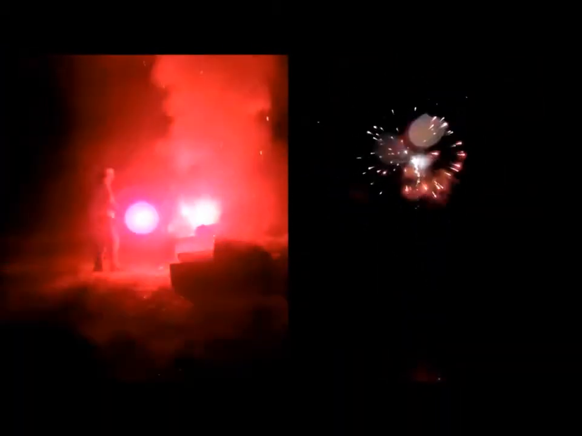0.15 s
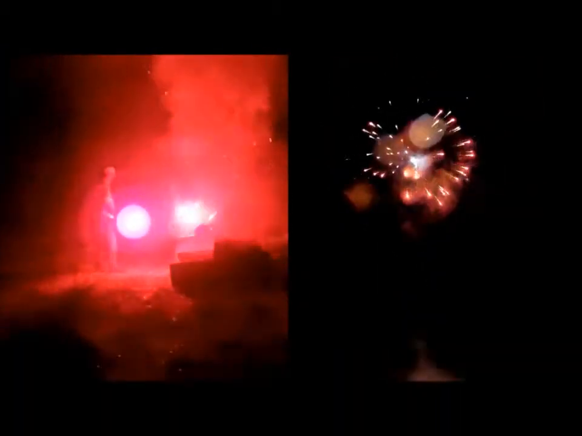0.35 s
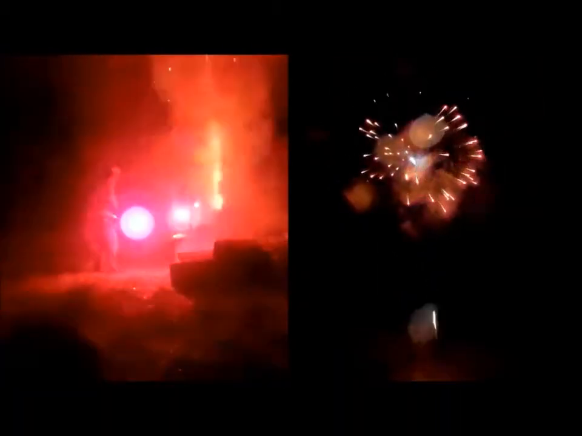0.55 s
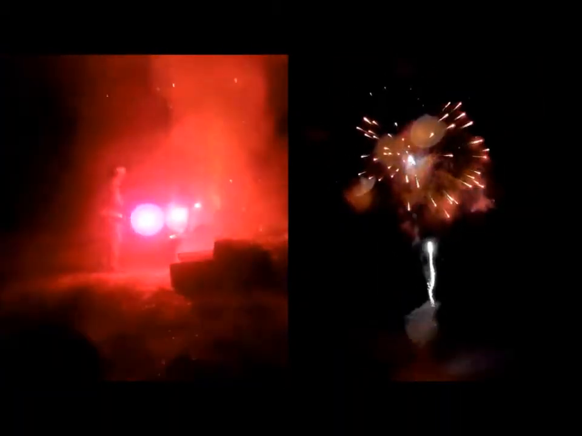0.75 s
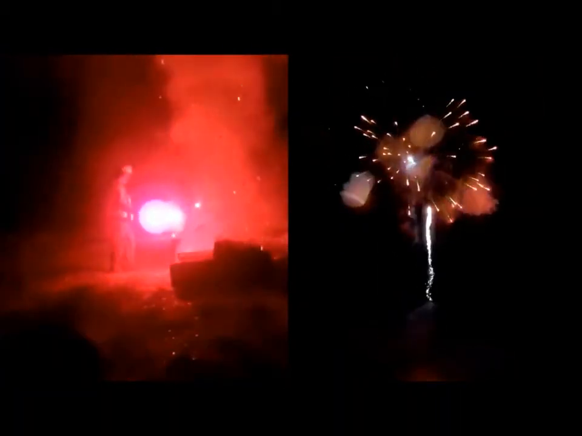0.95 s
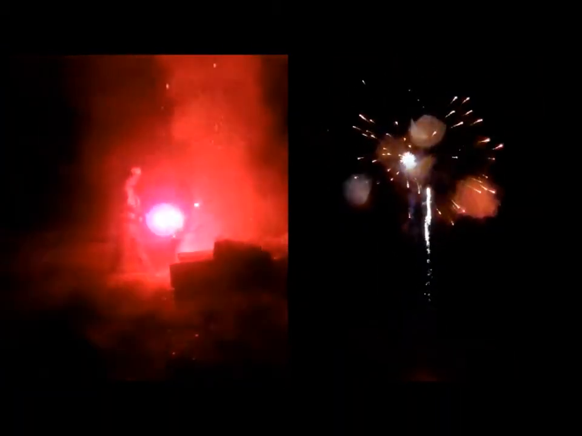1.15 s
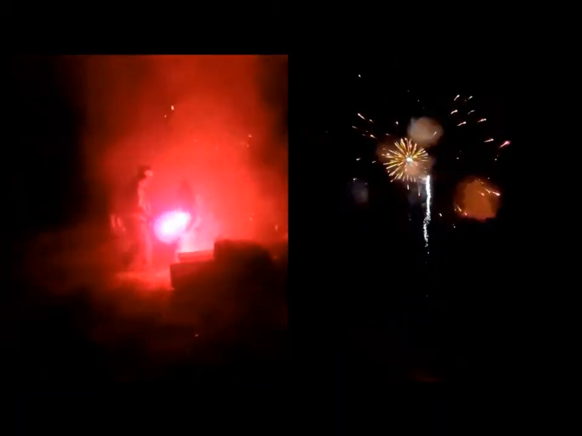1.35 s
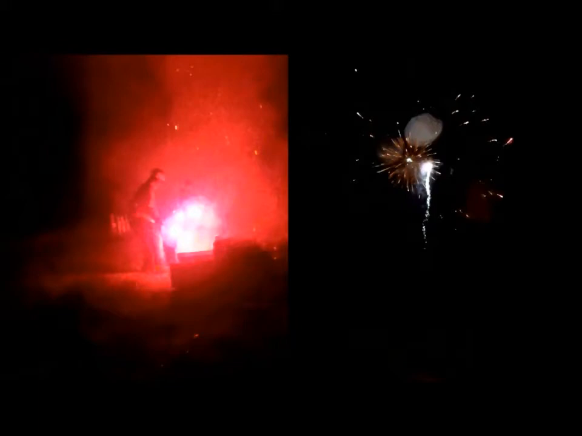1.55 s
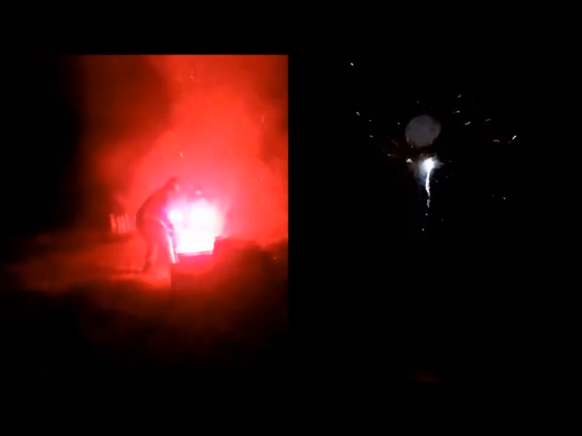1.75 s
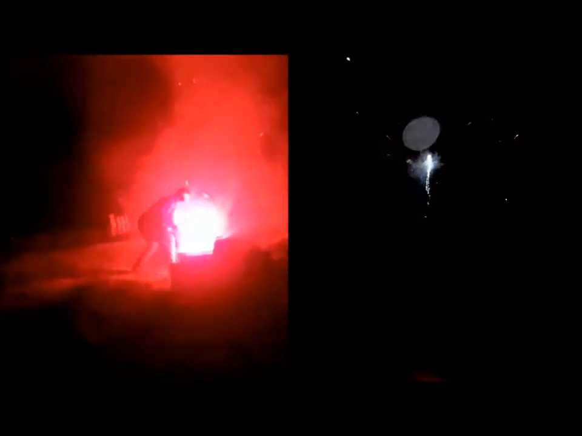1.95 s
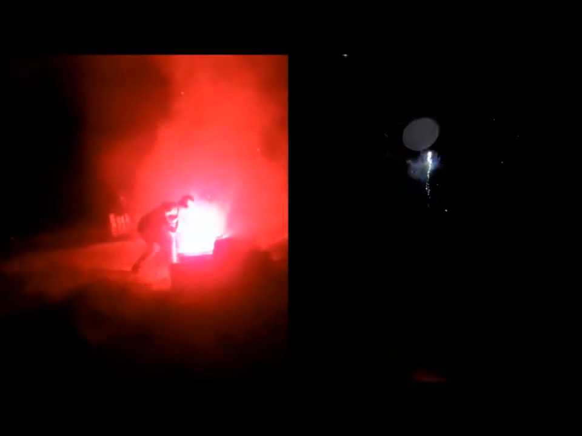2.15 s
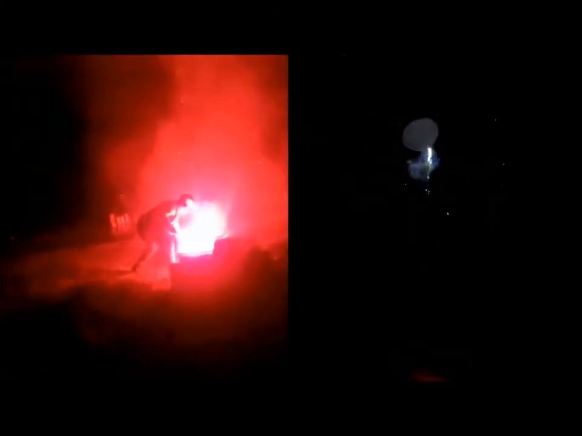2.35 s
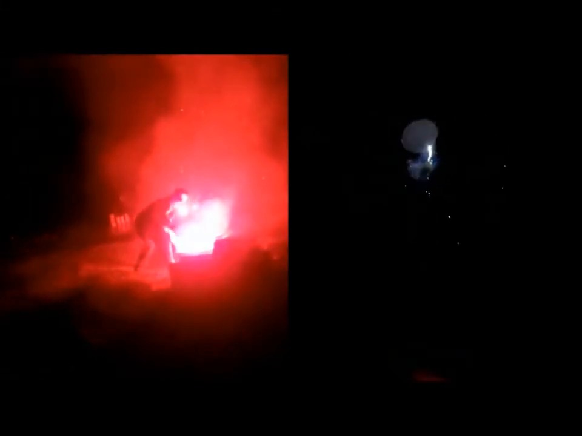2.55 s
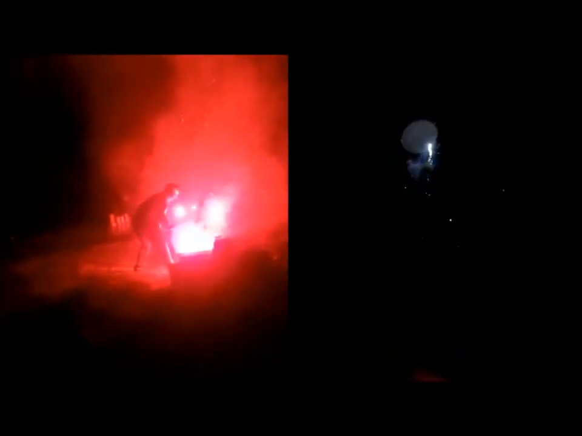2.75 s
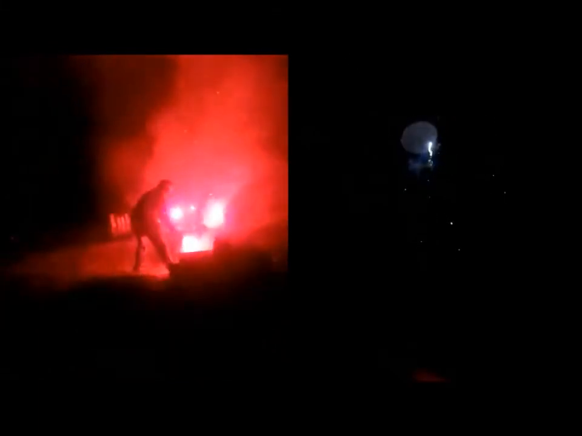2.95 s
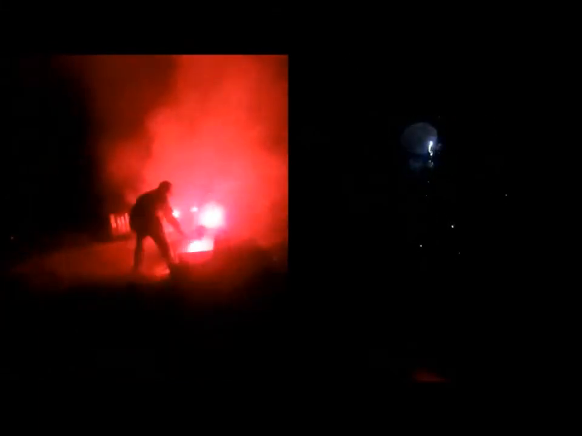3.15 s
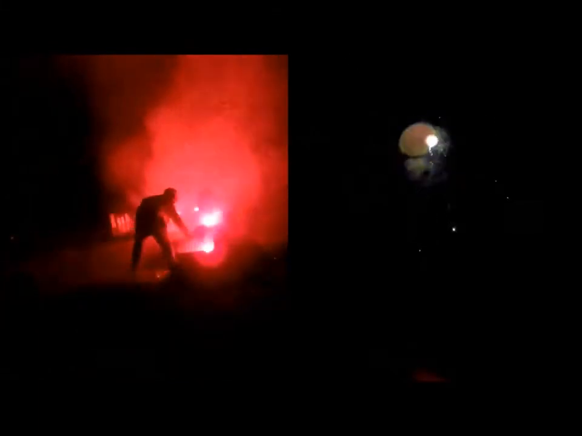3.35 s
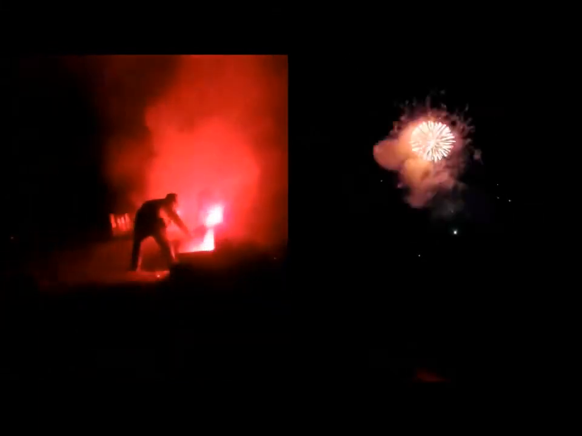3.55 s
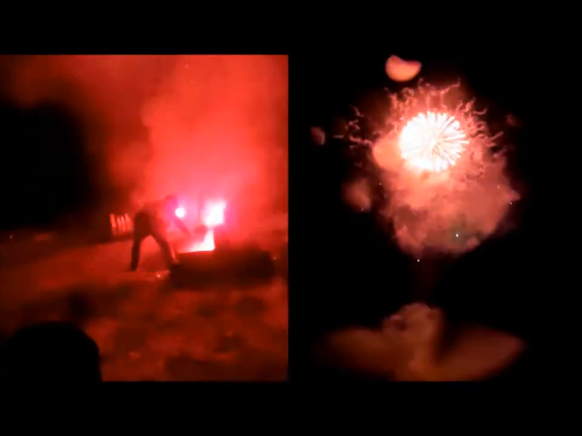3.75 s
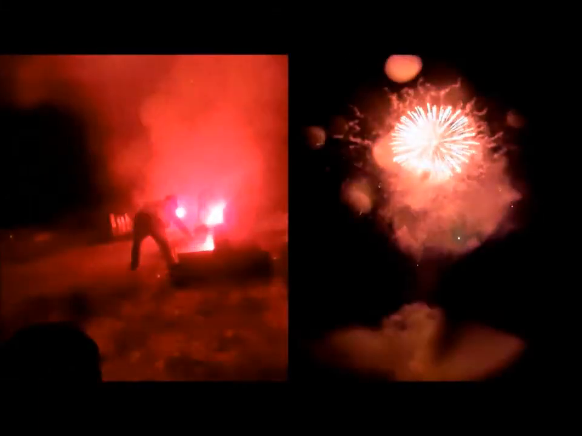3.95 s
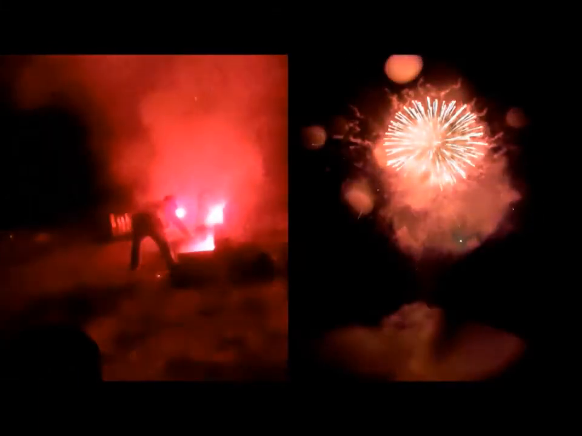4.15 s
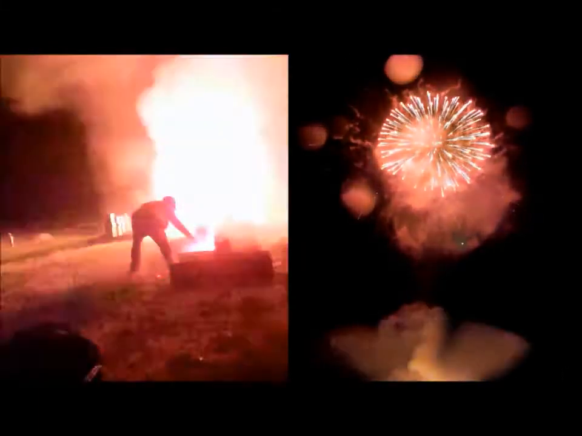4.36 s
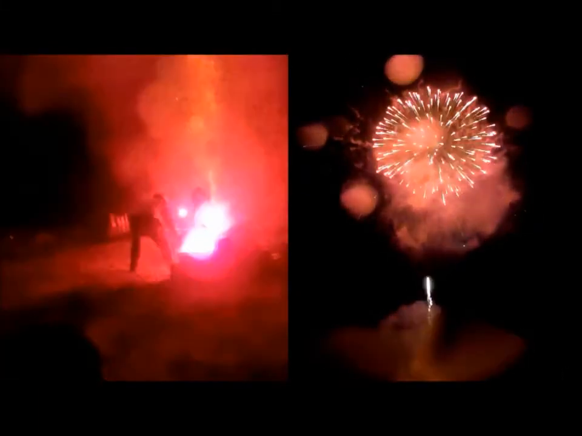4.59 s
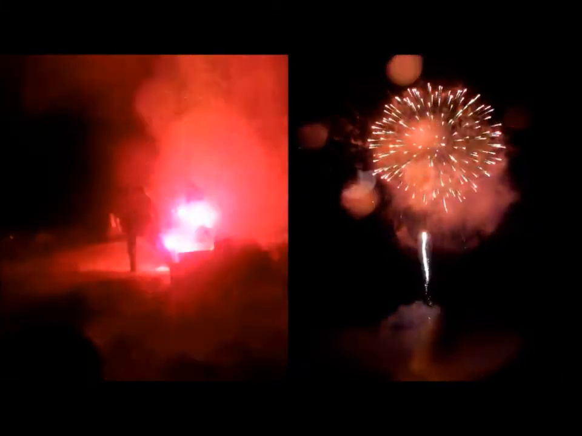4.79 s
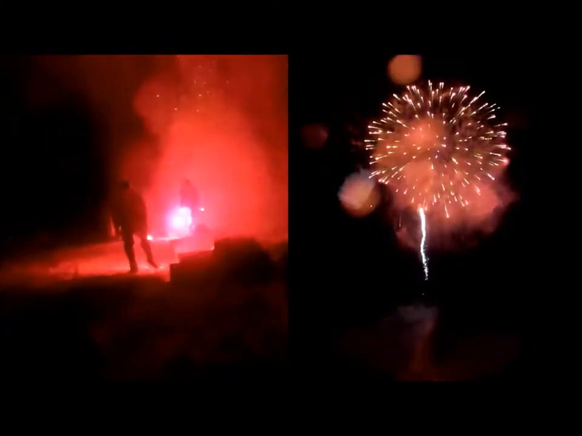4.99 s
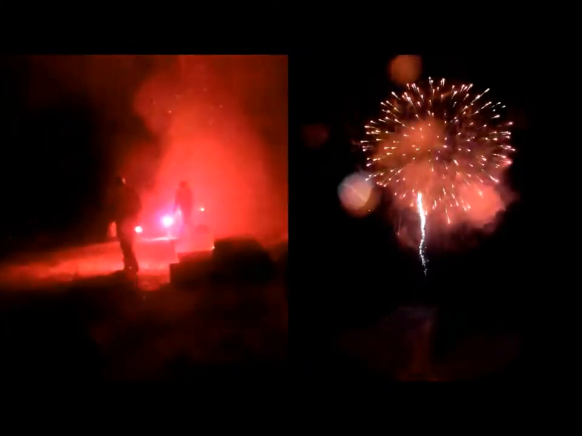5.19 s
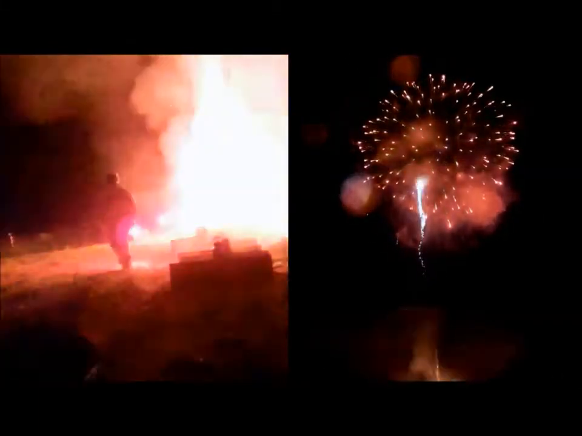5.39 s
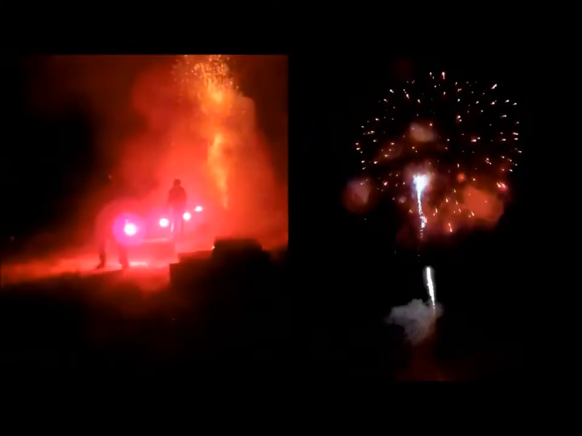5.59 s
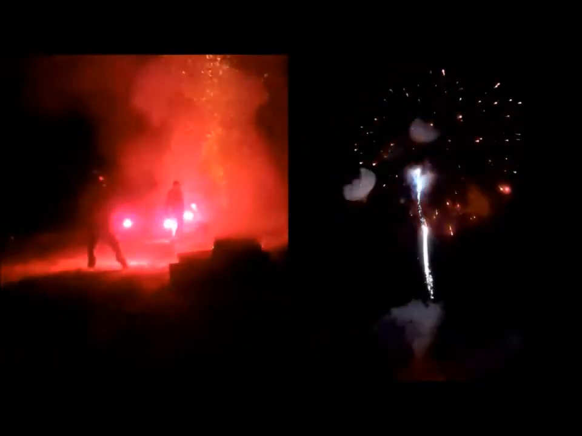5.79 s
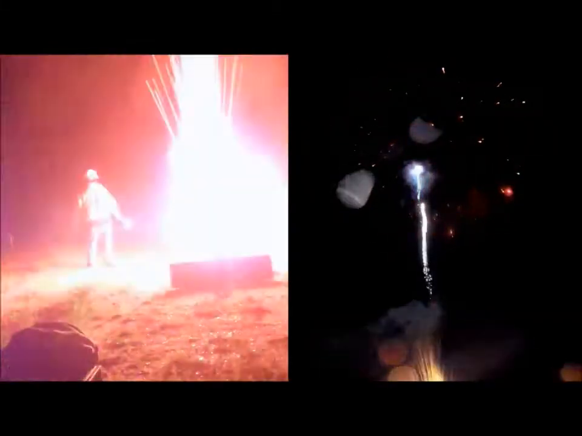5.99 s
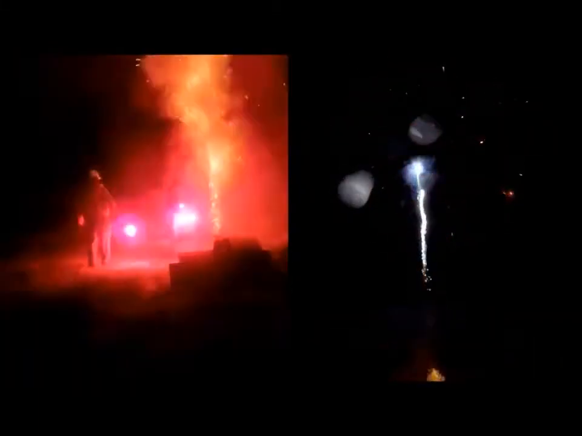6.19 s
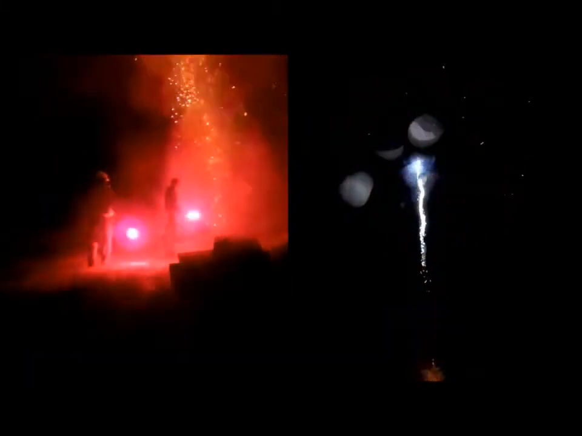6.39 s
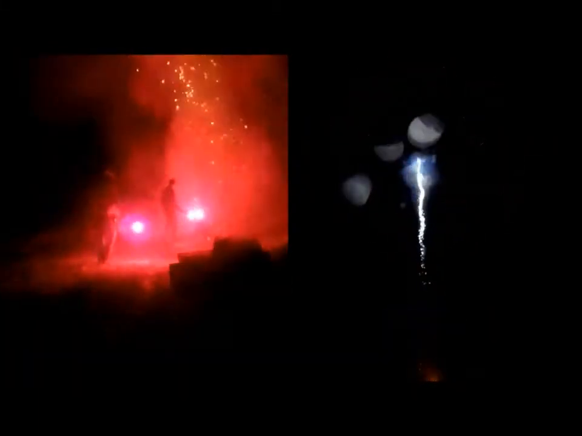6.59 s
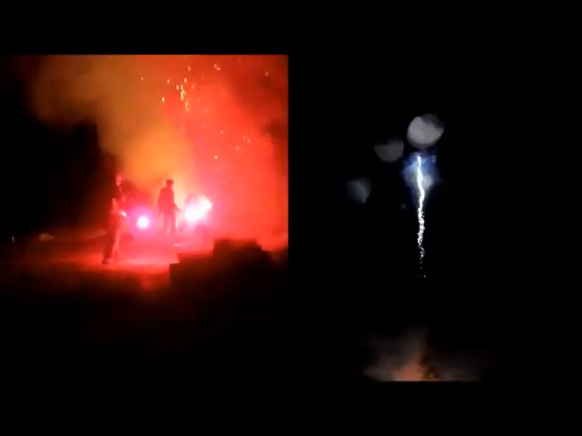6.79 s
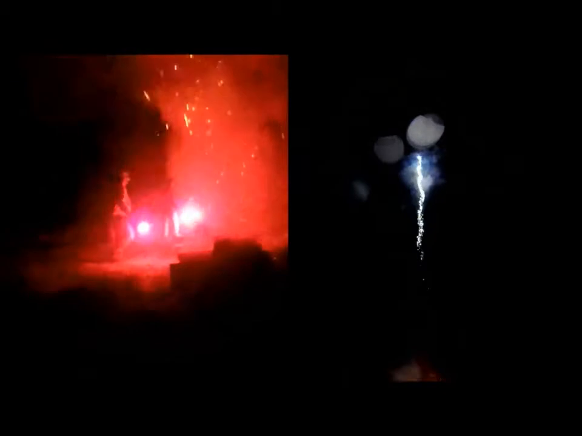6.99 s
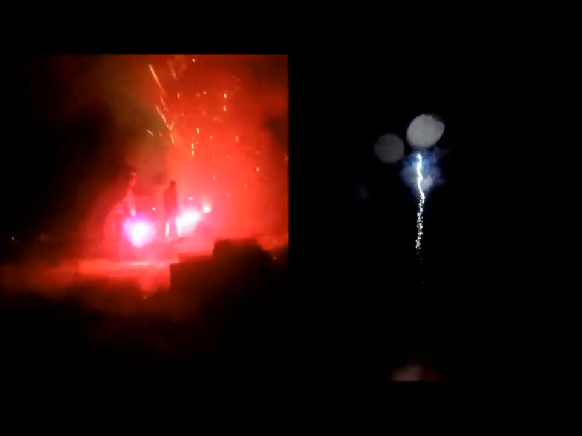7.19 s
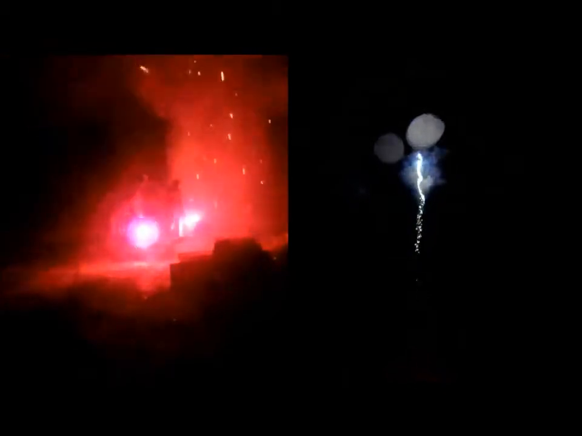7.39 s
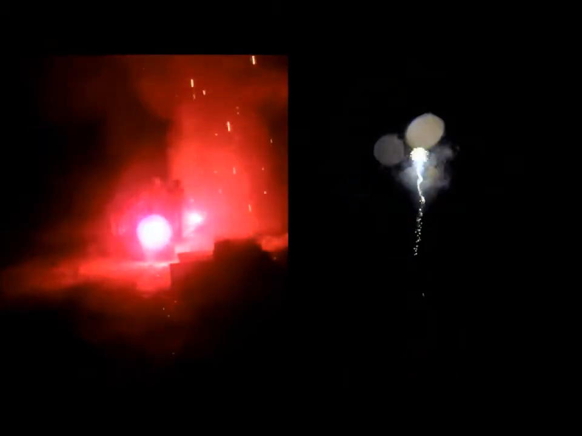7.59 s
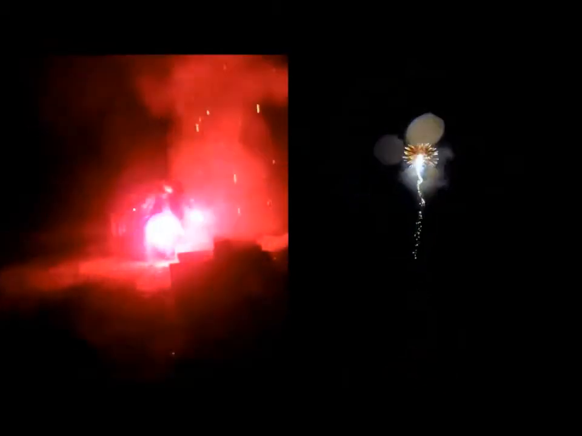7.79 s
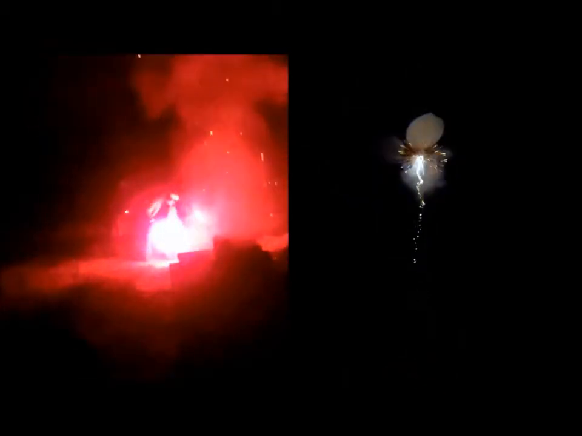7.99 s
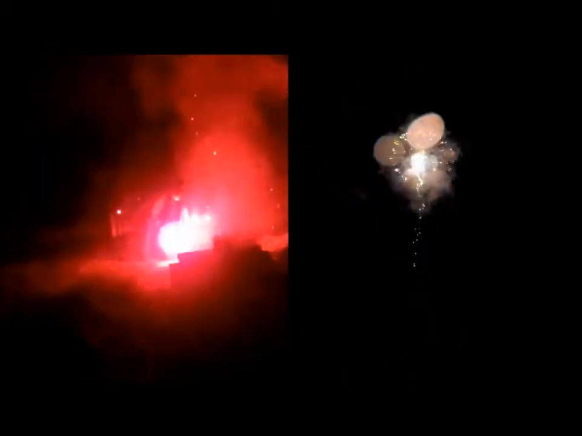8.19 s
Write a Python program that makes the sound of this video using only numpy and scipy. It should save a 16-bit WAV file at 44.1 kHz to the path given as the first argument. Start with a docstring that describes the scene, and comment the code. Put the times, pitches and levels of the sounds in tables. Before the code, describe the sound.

Firework shells fire from tubes right beside the microphone: spitting fuse cracks, a jet of gas, a deep chesty thump with a short wavering tube ring. Bangs overhead slap off the ground, echo from the field's edges and roll for seconds under thin sizzling hiss. Sparse at first, with a quiet gap, then crowded launches and crackles from six seconds, ending on a bang. Peaks are squashed, top treble missing.

```python
"""Fuses crack and sputter, gas spits, deep thumps launch shells, and bangs burst overhead with a ground echo.
These are night fireworks heard from beside the mortars in an open field, with echoes, long rolls and hiss.
Bangs and thumps are relaxing pressure steps; tubes and racks are dying tones, each wavering in pitch.
Cracks, echoes, rolls, hiss and night air are noise shaped in bands over time.
The microphone flattens the loudest peaks and loses the highest treble."""
import sys
import numpy as np
from scipy import signal
from scipy.io import wavfile

SR = 44100
rng = np.random.default_rng(int(sys.argv[2]) if len(sys.argv) > 2 else 0)


def int16_out(signal):
    """Quantize to a 16-bit WAV file."""
    q = np.round(np.clip(np.atleast_2d(signal).T, -1, 1) * 32767)
    wavfile.write(sys.argv[1], SR, q.astype(np.int16))


N = 363384

# Shells bursting overhead. Each row: start in seconds, blast level in dB, blast pitch in Hz,
# nearby scatter in dB, far roll in dB.
BURSTS = [(0.0018, 7.5, 159, -12, -23.5), (1.5294, 10.5, 257, -17.5, -28.5), (3.8431, 14, 220, -15, -27.5),
          (7.9819, 14, 237, -19.5, -31.5)]
# Lift charges that fire the shells. Each row: start in seconds, blast level in dB, blast pitch in Hz,
# tube ring in dB, tube pitch in Hz, rack boom in dB, nearby scatter in dB, far roll in dB,
# gas jet in dB, jet length in seconds.
LAUNCHES = [(0.5963, 4, 120, 0.5, 212, -9, -11.5, -18.5, 0.5, 0.0059),
            (4.544, 7.5, 91, -4.5, 267, -12.5, -12, -17, -3, 0.0075),
            (5.487, 8, 97, -2.5, 210, -13.5, -15, -22.5, -3.5, 0.013),
            (6.041, 4.5, 142, -13, 198, -22, -32, -43, -8, 0.0031),
            (6.111, 8.5, 124, -1, 302, -21, -14.5, -22.5, -2, .011),
            (7.0227, 5.5, 77, -22, 202, -23, -16.5, -23, -4.5, .003),
            (7.284, 5.5, 79, -13.5, 220, -22, -11.5, -15, -2.5, 0.0022),
            (7.455, 7.5, 77.5, -20, 221, -23, -16.5, -27, -3, 0.0042)]
# Loud cracks of the fast fuses. Each row: start in seconds, level in dB, length in seconds,
# brightness in dB per octave.
FUSE_CRACKS = [(0.544, -3.5, 0.0052, -0.5), (0.565, -3.5, 0.0023, -2.5), (4.501, -9, 0.0051, 0),
               (4.508, -2, 0.0012, 0.5), (5.422, -6, 0.0061, -1), (5.436, -3, .0025, -1),
               (6.047, -8.5, 0.0045, -1), (6.066, -5, .006, 1), (6.077, -9, .0034, 4),
               (6.095, -3, 0.0013, -2.5), (6.629, -23, .008, 1), (6.726, -23.5, 0.0026, 1),
               (6.873, -24.5, 0.0022, -0.5), (6.902, -17.5, 0.0014, 1), (6.96, -8, 0.0022, 1),
               (6.976, -16, 0.0065, 0), (7.1405, -7, .001, 0.5), (7.218, -9.5, .002, 3.5),
               (7.386, -16, 0.0035, 5), (7.404, -5.5, .004, 0)]
# Echoes of launches off two edges of the field. Each row: near return time in seconds, its level in dB,
# far return time in seconds, its level in dB.
LAUNCH_ECHOES = [(.672, -6.5, 0.71, -7.5), (4.6123, -9, 4.644, -6.5), (5.560, -15.5, 5.602, -13.5),
                 (6.205, -17, 6.25, -14), (7.086, -19, 7.11, -21), (7.349, -16.5, 7.39, -22)]
# How the far return breaks up along the edge. Each row: delay after it in seconds,
# level relative to it in dB, length in seconds.
FAR_EDGE = [(0, 0, .007), (0.018, -9, 0.021), (.057, -10, .005), (.09, -16.5, .014), (0.151, -20, .036)]
# Returns that follow every burst. Each row: delay after the burst in seconds,
# level relative to its far roll in dB, length in seconds.
BURST_ECHOES = [(0.073, 1, .015), (0.085, 6, 0.012), (.196, 3, .01), (.633, -12, .033), (0.73, -14, 0.021)]
# Times when the hiss swells. Each row: middle in seconds, level in dB, width setting in seconds,
# brightness in dB per octave.
HISS_SWELLS = [(.47, -37, .05, 1.5), (2.05, -43, 0.054, 0.5), (2.52, -45, .04, -4), (4.36, -42, .08, 1),
               (5.19, -46.5, 0.052, -1.5), (6.76, -35, 0.035, -1.5), (6.86, -41, 0.044, 0)]

# Colour of the burning gas in a crack. Each row: frequency in Hz, relative level in dB per Hz.
CRACK_COLOUR = [(40, -15), (150, -3), (400, -12.5), (900, -1.5), (1300, -7), (1800, 2), (2600, -3),
                (3500, -2), (4800, -3), (7000, -9), (10000, -16), (14000, -24)]
# Colour of the dull distinct echoes. Each row: frequency in Hz, relative level in dB per Hz.
ECHO_COLOUR = [(40, -17.5), (200, -18.5), (420, -1), (750, -0.5), (1300, -8), (2500, -16.5), (5000, -24),
               (14000, -56)]
# Colour of a burst scattered nearby. Each row: frequency in Hz, relative level in dB per Hz.
BURST_SCATTER = [(40, -18), (130, 0.5), (250, -2), (500, 0), (900, -3), (1800, -6), (3500, -8), (6000, -12),
                 (10000, -15), (14000, -28.5)]
# Colour of a launch scattered nearby. Each row: frequency in Hz, relative level in dB per Hz.
LAUNCH_SCATTER = [(40, -11.5), (130, 6), (300, -4.5), (700, 0), (1100, 5), (2000, 4.5), (4000, 3.5),
                  (7000, -2), (10000, -6), (14000, -28)]
# Colour of a burst's far roll. Each row: frequency in Hz, relative level in dB per Hz.
BURST_ROLL = [(30, -18), (70, -6.5), (130, -5.5), (220, -7), (300, -9.5), (430, -1), (620, -2.5), (900, 0),
              (1300, -4), (1900, -3), (3500, -13.5), (7000, -18), (14000, -51.5)]
# Colour of a launch's far roll. Each row: frequency in Hz, relative level in dB per Hz.
LAUNCH_ROLL = [(30, -17), (100, 0.5), (200, -21.5), (310, -12), (460, -0.5), (620, 4), (800, 2.5),
               (1300, -7.5), (1900, -5), (2800, -15.5), (4500, -18), (8000, -46), (14000, -46)]
# Colour of the comet and star hiss. Each row: frequency in Hz, relative level in dB per Hz.
COMET_COLOUR = [(40, -34.5), (1000, -10.5), (2500, 4), (5000, 1), (8000, -9.5), (11000, -18.5),
                (14000, -32)]
# Colour of the steady night air. Each row: frequency in Hz, relative level in dB per Hz.
NIGHT_AIR_COLOUR = [(25, -20), (45, -11.5), (65, 0), (90, -4), (130, -4.5), (200, -6), (290, -13),
                    (400, -6.5), (580, -6), (1000, -17.5), (1600, -26.5), (2800, -42.5), (6000, -41.5),
                    (13000, -57.5)]

# How long nearby scatter lasts. Each row: frequency in Hz, time to fall by 60 dB in seconds.
SCATTER_T60 = [(60, 0.51), (300, 0.47), (1000, 0.19), (3000, 0.63), (6000, 0.49), (12000, 0.22)]
# How long a burst's far roll lasts. Each row: frequency in Hz, time to fall by 60 dB in seconds.
BURST_T60 = [(60, 2.3), (500, 4.95), (1500, 4.3), (3000, 3.37), (6000, 2.6), (12000, 1.5)]
# How long a launch's far roll lasts. Each row: frequency in Hz, time to fall by 60 dB in seconds.
LAUNCH_T60 = [(60, 1.55), (500, 0.98), (1500, 2.13), (4000, 1.53), (12000, 1)]
# How alike the spread-out sound is, left and right. Each row: frequency in Hz, likeness from 0 to 1.
LIKENESS = [(40, 0.81), (150, 0.94), (500, 0.95), (1000, 0.81), (2000, 0.19), (5000, 0.1), (12000, 0.49)]

# Noise bands, and a slow clock with one tick every STEP samples
EDGES = 25 * 2 ** np.arange(0, 9.3, .4)   # Hz
CENTRES = np.sqrt(EDGES[1:] * EDGES[:-1])
STEP = 16
TIME = np.arange(N) / SR
TICKS = TIME[::STEP]

GROUND_DELAY_S, GROUND_SHARE = .0056, .9
RACK_HZ = 143
# The right channel is louder by RIGHT_DB; its blast pitch is the left one's times RIGHT_BASS_REACH.
RIGHT_DB, RIGHT_BASS_REACH = 1, 0.87
MUZZLE_LIKENESS = .68   # least left-right likeness of direct sound
# A soft leak comes first, then the jet until the shell leaves the tube, then a weaker outflow.
LEAK_S, LEAK_DB = .006, -18
JET_END_S, JET_TILT_DB = .0012, 0
OUTFLOW_DELAY_S, OUTFLOW_S, OUTFLOW_DB = 0.0036, .006, -12
# Each fuse crack sputters on in weaker pops.
FUSE_BURN_S, SPUTTER_DB, SPUTTER_SPREAD_DB, SPUTTER_S = .024, -12.5, 1.5, .0015
# Longer cracks stir up more scatter; the level is for a crack of typical length.
CRACK_SCATTER_DB, TYPICAL_CRACK_S, SCATTER_DB_PER_DOUBLING = -11.5, 0.0068, 3.5
ECHO_CRACK_DB = -2.5   # the near return still carries some of the crack
COMET_DB, COMET_RISE_S, COMET_FADE_DB_PER_S = -37.5, .15, 15.5   # level for the strongest launch
STARS_DB, STARS_RISE_S, STARS_FADE_DB_PER_S, STARS_TILT_DB = -41.5, .25, 13.5, -1
HISS_HZ, HISS_WIDTH_HZ, HISS_DB = 2150, 400, -60
NIGHT_AIR_DB = -47.5
CUTOFF_HZ = 14100


def shell_blasts():
    """Each bang is a pressure step that arrives from above, then again off the ground."""
    out = np.zeros((2, N))
    for s, db, hz, *_ in BURSTS:
        bang = from_db(db) * shock(hz, q=0.98, push_s=0.033)
        add(out, s, bang)
        add(out, s + GROUND_DELAY_S, GROUND_SHARE * bang)
    return out


def mortar_thumps(heave_db=-16, heave_hz=44):
    """The lift charge shoves the air, rings the emptied tube and jolts its rack; the outflow adds a slow heave."""
    out = np.zeros((2, N))
    soften = signal.butter(1, 900, fs=SR, output="sos")
    for s, db, hz, ring_db, tube_hz, rack_db, *_ in LAUNCHES:
        thump = from_db(db) * shock(hz, q=0.93, push_s=0.037)
        heave = from_db(db + heave_db) * shock(heave_hz, q=1.53, push_s=.06)
        add(out, s, signal.sosfilt(soften, thump + heave))
        tube = ring(ring_db, tube_hz, t60=0.09)
        rack = ring(rack_db, RACK_HZ, t60=0.23)
        add(out, s + 0.0099, tube + rack)
    return out


def shock(hz, q, push_s):
    """A pressure step that relaxes; with its bass lost it swings to and fro, more slowly on the right."""
    step = np.exp(-TIME[:SR // 5] / push_s)
    pitches = hz * np.array([1, RIGHT_BASS_REACH]) / np.sqrt(RIGHT_BASS_REACH)
    pair = []
    for w in 2 * np.pi * pitches:
        b, a = signal.bilinear([1, 0, 0], [1, w / q, w * w], SR)
        once = signal.lfilter(b, a, step)
        pair.append(-signal.lfilter(b, a, once))
    return np.array(pair)


def ring(db, hz, t60, unsteady=0.11):
    """One dying tone; hot gas leaving the tube makes its pitch and strength waver."""
    t = TIME[:SR // 2]
    bend = np.interp(t, TICKS, flicker(150))
    swell = np.interp(t, TICKS, flicker(150))
    phase = 2 * np.pi * np.cumsum(hz * (1 + unsteady * bend)) / SR
    return from_db(db - 60 * t / t60 + 2 * swell) * np.sin(phase)


def gas_cracks(count=2):
    """List the gas bursts: fuse cracks with weaker pops, and each launch's leak, jet and outflow."""
    # Each row: start in seconds, level in dB, length in seconds, brightness in dB per octave.
    rows = list(FUSE_CRACKS)
    for s, db, length, tilt in FUSE_CRACKS:
        for k in range(count):
            later = length + FUSE_BURN_S * (k + rng.random()) / count
            pop_db = db + SPUTTER_DB + SPUTTER_SPREAD_DB * rng.standard_normal()
            rows.append((s + later, pop_db, SPUTTER_S, tilt))
    for s, *_, jet_db, jet_s in LAUNCHES:
        jet_start = s + JET_END_S - jet_s
        rows.append((jet_start - LEAK_S, jet_db + LEAK_DB, LEAK_S, JET_TILT_DB))
        rows.append((jet_start, jet_db, jet_s, JET_TILT_DB))
        rows.append((s + OUTFLOW_DELAY_S, jet_db + OUTFLOW_DB, OUTFLOW_S, JET_TILT_DB))
    return rows


def muzzle_cracks(cracks):
    """Short jets of burning gas that swell, sputter and stop, each with a faint spray that dies more slowly."""
    power = 0
    sputter = from_db(2.9 * flicker(1200)) ** 2
    for s, db, length, tilt in cracks:
        swell = np.clip((TICKS - s) / length + 0.36, 0, 1)
        jet = swell * puff(s, length, .0007) * sputter
        spray = from_db(-21) * puff(s, length, .007)
        power = power + shares(CRACK_COLOUR, tilt) * (from_db(db) ** 2 * (jet + spray))
    return power


def buffeting():
    """The push of air from each launch rumbles in both microphone ports separately."""
    gust = sum(from_db(db - 29.5) * puff(s, .012, .02) for s, db, *_ in LAUNCHES)
    band = signal.butter(2, [20, 110], "band", fs=SR, output="sos")
    rumble = signal.sosfilt(band, rng.standard_normal((2, N)))
    return np.interp(TIME, TICKS, gust) * rms_one(rumble)


def echoes():
    """Returns off the field's edges, the tearing of shell cases, and the ground clutter right behind it."""
    dull = slap = tearing = clutter = 0
    for near_s, near_db, far_s, far_db in LAUNCH_ECHOES:
        dull = dull + from_db(near_db) ** 2 * puff(near_s, 0.0033, .002)
        slap = slap + from_db(near_db + ECHO_CRACK_DB) ** 2 * puff(near_s, .001, .001)
        for lag, db, length in FAR_EDGE:
            dull = dull + from_db(far_db + db) ** 2 * puff(far_s + lag, length, 0.0017)
    for s, *_, roll_db in BURSTS:
        for lag, db, length in BURST_ECHOES:
            dull = dull + from_db(roll_db + db) ** 2 * puff(s + lag, length, 0.0036)
        tearing = tearing + from_db(-14) ** 2 * puff(s, 0.0014, 0.0013)
        clutter = clutter + from_db(-8.5) ** 2 * puff(s + .003, .008, 0.0027)
    bright = shares(CRACK_COLOUR) * (tearing + slap)
    return shares(ECHO_COLOUR) * dull + bright + shares(BURST_SCATTER, tilt_db=-3.0) * clutter


def surroundings(cracks):
    """Sound scatters back from nearby first, then as a rougher roll from far away."""
    crack_hits = []
    for s, db, length, _ in cracks:
        extra_db = SCATTER_DB_PER_DOUBLING * np.log2(length / TYPICAL_CRACK_S)
        crack_hits.append((s, db + CRACK_SCATTER_DB + extra_db))
    burst_near = [(b[0], b[3]) for b in BURSTS]
    launch_near = [(m[0], m[6]) for m in LAUNCHES]
    burst_far = [(b[0], b[4]) for b in BURSTS]
    launch_far = [(m[0], m[7]) for m in LAUNCHES]
    crack_t60 = [(100, 0.39), (3000, 0.12), (12000, 0.63)]   # Hz, seconds

    near = reverberate(burst_near, BURST_SCATTER, SCATTER_T60, build_s=0.046, delay_s=0.0099)
    near += reverberate(launch_near, LAUNCH_SCATTER, SCATTER_T60, build_s=0.041, delay_s=0.043)
    near += reverberate(crack_hits, CRACK_COLOUR, crack_t60, build_s=0.0053, delay_s=.008)
    far = reverberate(burst_far, BURST_ROLL, BURST_T60, build_s=0.038, delay_s=0.048)
    far += reverberate(launch_far, LAUNCH_ROLL, LAUNCH_T60, build_s=0.034, delay_s=0.078)
    return near * terrain(.5, 1.3, 1.0) + far * terrain(.6, 1.5, 1.5)


def reverberate(hits, colour, t60s, build_s, delay_s):
    """Returned power builds as the wave meets more obstacles, then dies band by band."""
    feed = 0   # each hit: start in seconds, level in dB
    for s, db in hits:
        feed = feed + from_db(db) ** 2 * puff(s + delay_s, 0, build_s)
    feed = feed * STEP / SR / build_s
    keep = from_db(-60 * STEP / SR / per_band(t60s)[:, 0]) ** 2   # share left after one tick
    decays = np.array([signal.lfilter([1], [1, -k], feed + 1e-18) for k in keep])
    return shares(colour) * decays


def terrain(lumpy_db, grain_db, patchy_db):
    """Uneven ground returns sound in clumps and fine grains, with a colour that keeps changing."""
    patches = np.array([flicker(30) for _ in CENTRES])
    return from_db(lumpy_db * flicker(45) + grain_db * flicker(400) + patchy_db * patches) ** 2


def burning_hiss():
    """Comet tails after each launch and stars after each burst sputter, fade and now and then swell."""
    strongest_db = max(m[1] for m in LAUNCHES)
    tails = stars = swells = 0
    for s, db, *_ in LAUNCHES:
        tail_db = COMET_DB + db - strongest_db
        tails = tails + burn(s, tail_db, COMET_RISE_S, COMET_FADE_DB_PER_S)
    for s, *_ in BURSTS:
        stars = stars + burn(s, STARS_DB, STARS_RISE_S, STARS_FADE_DB_PER_S)
    for s, db, width, tilt in HISS_SWELLS:
        hump = 1 / np.cosh(np.clip((TICKS - s) / width, -60, 60))
        swells = swells + shares(COMET_COLOUR, tilt) * (from_db(db) ** 2 * hump)
    steady = shares(COMET_COLOUR) * tails + shares(COMET_COLOUR, STARS_TILT_DB) * stars
    return (steady + swells) * from_db(0.86 * flicker(350)) ** 2


def burn(s, db, rise_s, fade_db_per_s):
    """Power of something that catches fire at s, then recedes and burns down."""
    age = np.maximum(TICKS - s, 0)
    return np.minimum(age / rise_s, 1) * from_db(db - fade_db_per_s * age) ** 2


def night_air():
    """Steady power in each band for the quiet air of the field."""
    return shares(NIGHT_AIR_COLOUR) * from_db(NIGHT_AIR_DB) ** 2


def thin_hiss():
    """Noise passed through a narrow band makes a faint, steady hiss that shows in the lull."""
    edges = [HISS_HZ - HISS_WIDTH_HZ / 2, HISS_HZ + HISS_WIDTH_HZ / 2]
    band = signal.butter(2, edges, "band", fs=SR, output="sos")
    return from_db(HISS_DB) * rms_one(signal.sosfilt(band, rng.standard_normal((2, N))))


def turbulence(direct, diffuse):
    """Stereo noise follows the power in each band; direct sound is more alike in the two channels."""
    out = np.zeros((2, N))
    white = rng.standard_normal((2, 2, N))   # neighbouring bands use different noise
    for k, alike in enumerate(np.clip(per_band(LIKENESS)[:, 0], 0, .99)):
        sos = signal.butter(2, EDGES[k:k + 2], "band", fs=SR, output="sos")
        mid, side = rms_one(signal.sosfilt(sos, white[k % 2]))
        total = direct[k] + diffuse[k]
        common = max(alike, MUZZLE_LIKENESS) * direct[k] + alike * diffuse[k]
        mid = mid * np.interp(TIME, TICKS, np.sqrt((total + common) / 2))
        side = side * np.interp(TIME, TICKS, np.sqrt((total - common) / 2))
        out += [mid + side, mid - side]
    return out


def puff(s, length, fade_s):
    """Power that starts at once, holds and dies."""
    age = TICKS - s
    return (age >= 0) * np.exp(-np.clip((age - length) / fade_s, 0, 60))


def flicker(rate):
    """Smooth random wander with about rate new values a second, scaled to unit rms."""
    return rms_one(np.interp(TICKS * rate, np.arange(N // STEP), rng.standard_normal(N // STEP)))


def shares(colour, tilt_db=0):
    """Share of a sound's power in each band; the tilt turns around 2000 Hz."""
    tilt = tilt_db * np.log2(CENTRES / 2000)[:, None]
    power = from_db(per_band(colour) + tilt) ** 2 * np.diff(EDGES)[:, None]
    return power / power.sum()


def per_band(points):
    """Read a table over log frequency at the band centres, as a column."""
    hz, value = np.transpose(points)
    return np.interp(np.log(CENTRES), np.log(hz), value)[:, None]


def from_db(db):
    """Turn decibels into gain."""
    return 10 ** (np.asarray(db) / 20)


def rms_one(x):
    """Scale to unit rms, a measure of average strength."""
    return x / np.sqrt(np.mean(x ** 2) + 1e-20)


def add(track, s, sound):
    """Mix a sound in from time s in seconds."""
    start = max(0, round(s * SR))
    track[..., start:start + sound.shape[-1]] += sound[..., :N - start]


def scene():
    """Add the blasts to the gas noise, echoes, hiss and night air, then set the left-right balance."""
    cracks = gas_cracks()
    direct = muzzle_cracks(cracks) + echoes()
    diffuse = surroundings(cracks) + burning_hiss() + night_air()
    sound = shell_blasts() + mortar_thumps() + buffeting()
    sound = sound + turbulence(direct, diffuse) + thin_hiss()
    return sound * from_db([[-RIGHT_DB / 2], [RIGHT_DB / 2]])


def record(dry):
    """The microphone flattens the peaks; the treble is softened, then cut off."""
    flattened = dry / (1 + dry ** 4) ** .25
    soften = signal.butter(3, min(11500, .45 * SR), fs=SR, output="sos")
    cut = signal.ellip(10, .2, 80, CUTOFF_HZ, fs=SR, output="sos")
    return signal.sosfilt(cut, signal.sosfilt(soften, flattened))


dry = scene()
out = record(dry)
int16_out(out)
```